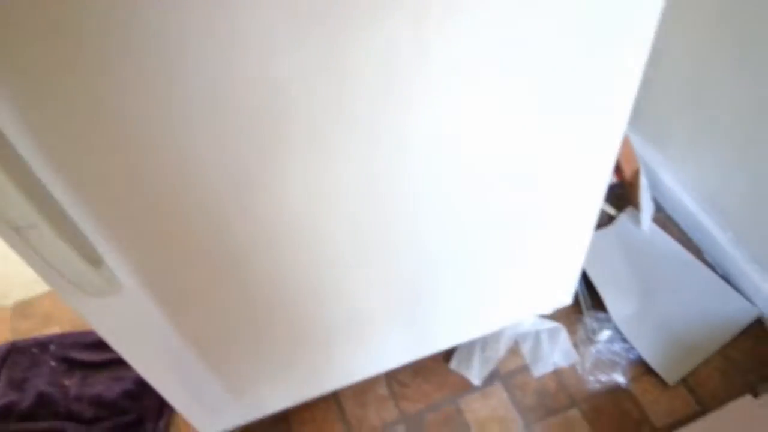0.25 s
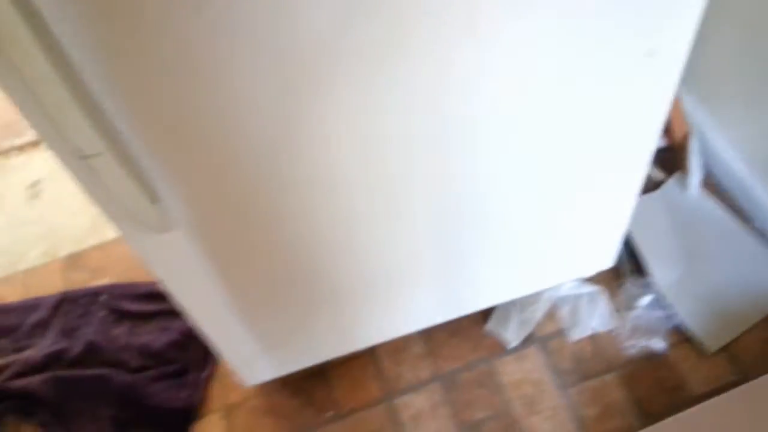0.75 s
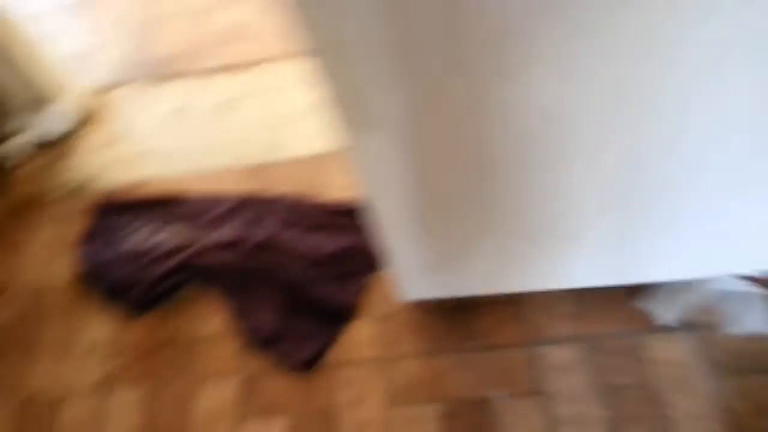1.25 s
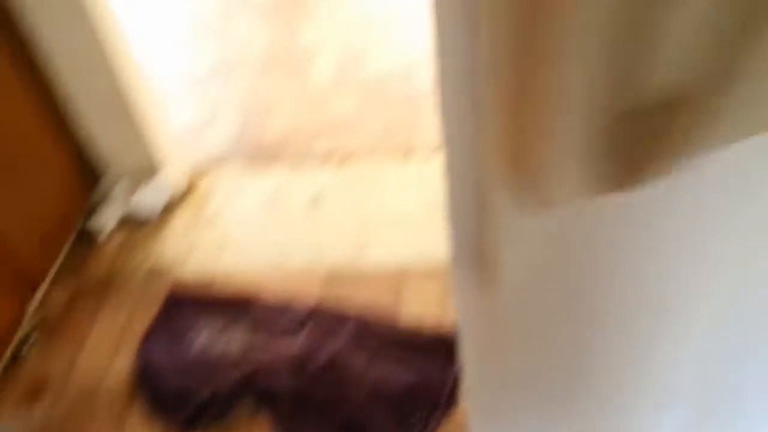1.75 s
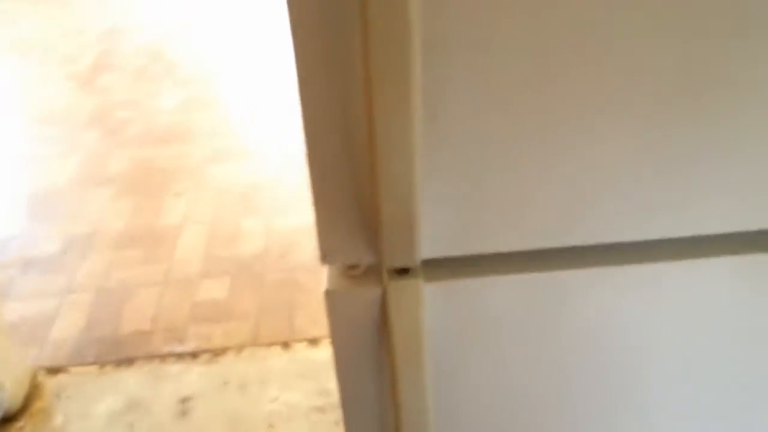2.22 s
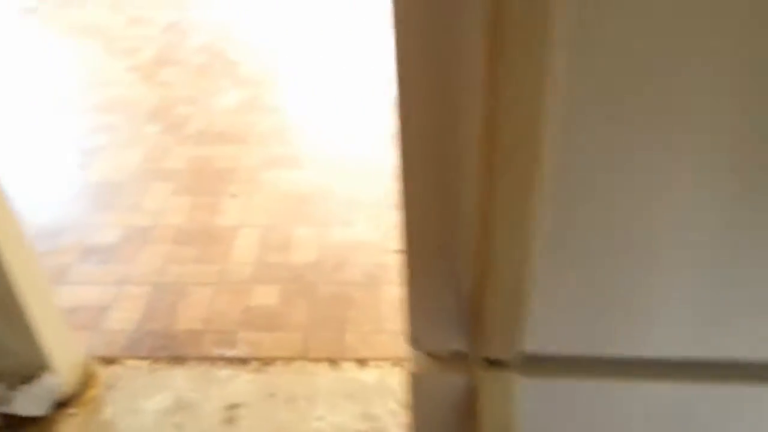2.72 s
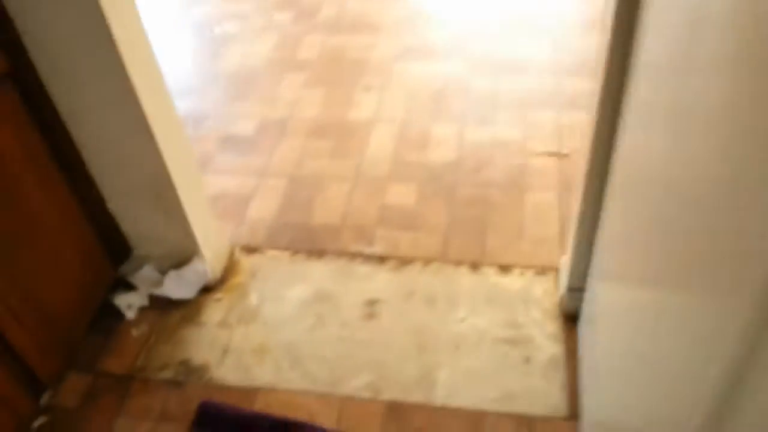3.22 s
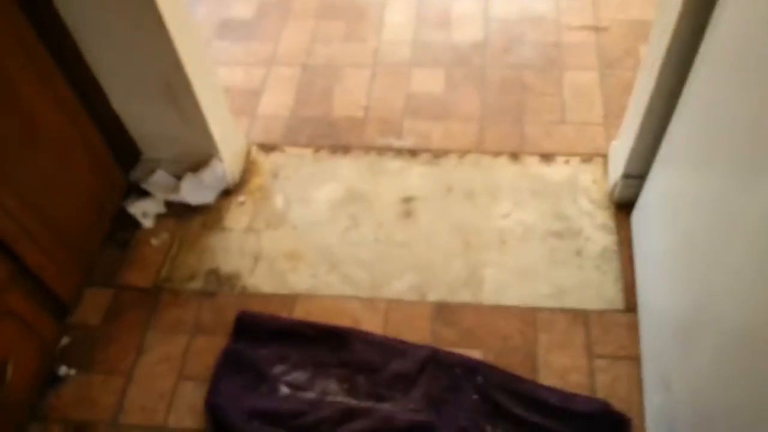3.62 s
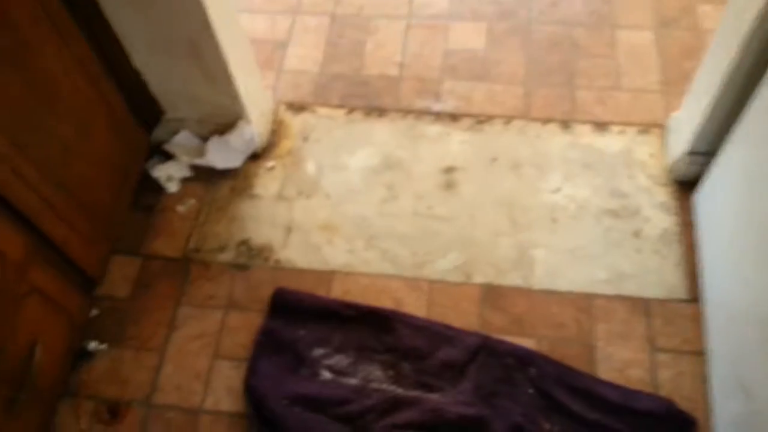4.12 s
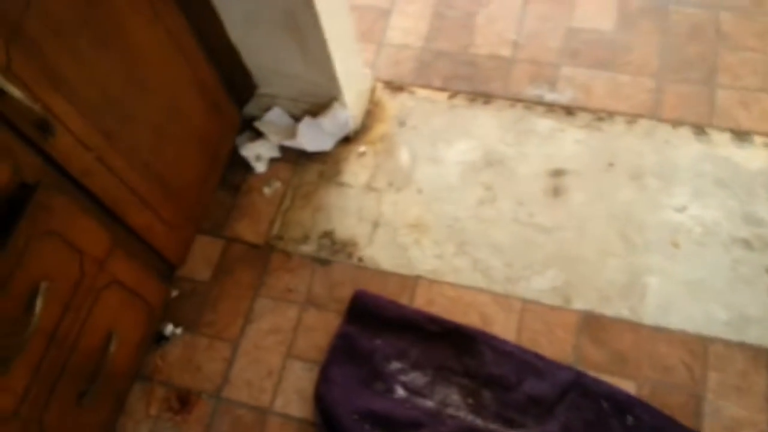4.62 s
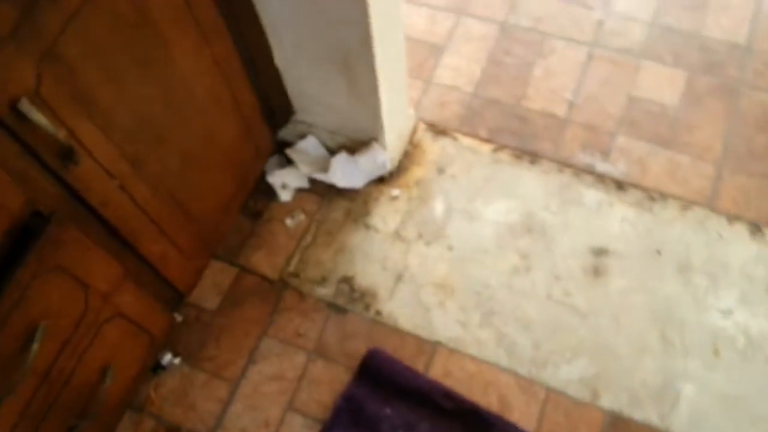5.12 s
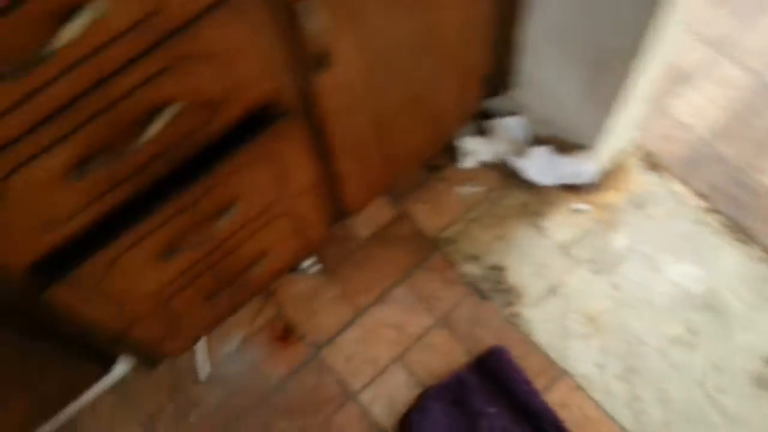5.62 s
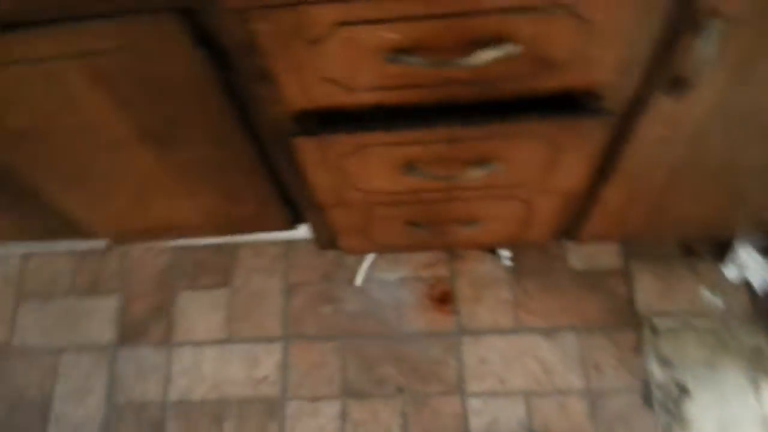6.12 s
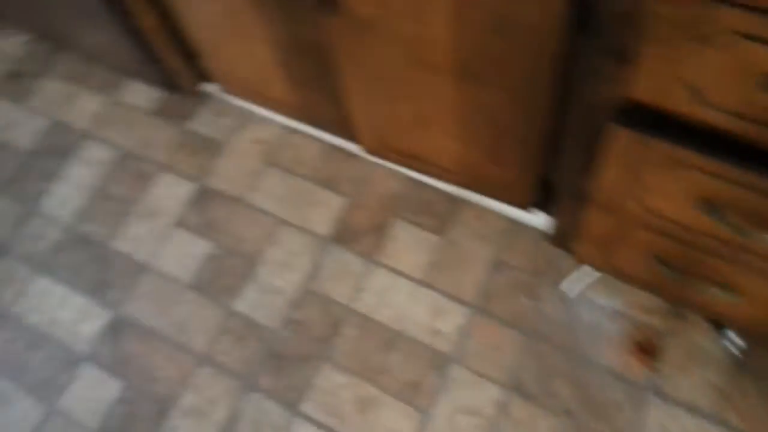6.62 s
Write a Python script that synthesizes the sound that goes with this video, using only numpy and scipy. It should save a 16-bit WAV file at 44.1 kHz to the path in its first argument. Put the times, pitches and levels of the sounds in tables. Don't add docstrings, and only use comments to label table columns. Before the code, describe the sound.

A refrigerator handle snaps and jars rattle, then the door slams hard, echoing through a tiled kitchen before shoes shuffle and tick on grit.

```python
import sys
import numpy as np
from scipy import signal
from scipy.fft import rfft, irfft
from scipy.io import wavfile
from scipy.ndimage import uniform_filter1d

SR = 44100
rng = np.random.default_rng(int(sys.argv[2]) if len(sys.argv) > 2 else 0)


def to_linear_factor(level_db):
    exponent = np.asarray(level_db, float) / 20
    return 10 ** exponent


def store_wav(level_fs):
    pcm = np.round(np.clip(np.atleast_2d(level_fs), -1, 1) * 32767)
    wavfile.write(sys.argv[1], SR, pcm.T.astype(np.int16))


N = 302159

# frequency in Hz, left-right likeness (-1 to 1).
LIKENESS = [(60, 0.29), (130, 0.99), (290, 0.95), (640, 0.58), (1400, -0.17), (15000, 0.056)]


def at_hz(points, hz):
    table_hz, values = np.array(points)[:, 0], np.array(points)[:, 1]
    return np.interp(np.log(hz), np.log(table_hz), values)


def in_time(rows, before=-120):
    s, *columns = np.transpose(rows)
    return np.array([np.interp(np.arange(N) / SR, s, c, before, before) for c in columns])


def rms_one(x):
    return x / np.sqrt(np.mean(x ** 2) + 1e-20)


def drift(rate, count):
    knots_per_s = 60
    knots = rng.standard_normal((count, int(N / SR * knots_per_s) + 2))
    r = np.exp(-2 * np.pi * rate / knots_per_s)
    slow = rms_one(signal.lfilter([1], [1, -r], knots))
    at = np.arange(N) / SR * knots_per_s
    return np.array([np.interp(at, np.arange(len(v)), v) for v in slow])


def bandpass(x, order, low_hz, high_hz):
    return signal.sosfilt(signal.butter(order, [low_hz, high_hz], "band", fs=SR, output="sos"), x)


def colour(x, spectrum, size=4096):
    cepstrum = irfft(np.log(to_linear_factor(at_hz(spectrum, np.linspace(1, SR / 2, size // 2 + 1)))))
    cepstrum[1:size // 2] *= 2
    cepstrum[size // 2 + 1:] = 0
    kernel = irfft(np.exp(rfft(cepstrum)))
    kernel = kernel / np.linalg.norm(kernel)
    return signal.fftconvolve(x, kernel[None], axes=1)[:, :x.shape[1]]


def ring(clicks, hz, t60):
    r, w = to_linear_factor(-60 / (t60 * SR)), 2 * np.pi * hz / SR
    return signal.lfilter([0, np.sin(w)], [1, -2 * r * np.cos(w), r * r], clicks + 1e-18)


def add(out, s, sound, pan_db):
    lag_s_per_db = 3e-5
    for k, side in enumerate((1, -1)):
        at = round((s - side * pan_db * lag_s_per_db) * SR)
        out[k, at:at + len(sound)] += to_linear_factor(side * pan_db / 4) * sound[:N - at]


def pair_noise(size, per_band):
    out, white = 0, rng.standard_normal((2, 2, size))
    edges = 25 * 2 ** np.arange(0, 9.6, .5)
    for k, (low, high) in enumerate(zip(edges, edges[1:])):
        centre = np.sqrt(low * high)
        mid, side = bandpass(white[k % 2], 2, low, high)
        alike = np.clip(at_hz(LIKENESS, centre), -1, 1)
        pair = np.sqrt(1 + alike) * mid + np.sqrt(1 - alike) * side * [[1], [-1]]
        out = out + per_band(k, centre) * pair
    return out


def grains(per_s, spread_db):
    sizes = to_linear_factor(spread_db * np.minimum(rng.exponential(1, (2, N)), 5)) * rng.choice([-1, 1], (2, N))
    return rms_one(sizes * (rng.random((2, N)) < per_s / SR))


def blow(hits, spectrum, modes, crack_db, modes_db, wet_db, edge_db, soft_hz):
    clicks, rung, crack = np.zeros((2, N)), np.zeros((2, N)), np.zeros((2, N))
    for s, db, pan_db in hits:
        add(clicks, s, to_linear_factor(np.array([db])), pan_db)
    first_s = hits[0][0]
    near = slice(round((first_s - .01) * SR), round((first_s + .5) * SR))
    pad = signal.butter(2, soft_hz, fs=SR, output="sos")
    padded = signal.sosfilt(pad, clicks[:, near])
    for k, (hz, level_db, t60) in enumerate(modes):
        rung[:, near] += (-1) ** k * to_linear_factor(level_db + modes_db) * ring(padded, hz, t60)
    crack[:, near] = colour(clicks[:, near], spectrum)
    rung[:, near] += to_linear_factor(crack_db) * signal.sosfilt(pad, crack[:, near])
    rung[:, near] += to_linear_factor(edge_db) * np.diff(crack[:, near], prepend=0)
    return rung, to_linear_factor(wet_db) * crack


def door_slam():
    # start in seconds, peak in dB, left-right in dB.
    slam_hits = [
        (2.3003, -23, 2.5),
        (2.3017, -0.5, 4),
        (2.3155, -21, -4),
        (2.3445, -14.5, 3.5),
    ]
    # frequency in Hz, density in dB per Hz.
    slam_spectrum = [(40, -36), (85, -17), (130, -5.5), (215, -2.5), (330, -4.5), (700, -1), (1200, 0),
                     (1600, -2.5), (2200, 5.5), (3200, -12), (5000, -26), (6500, -22.5), (8500, -34),
                     (11500, -32), (14000, -53)]
    # frequency in Hz, level in dB, t60 in seconds.
    door_modes = [(215, -10.5, 0.017), (685, 6.5, 0.0053), (2900, 2, 0.0045), (410, -29, 0.54),
                  (723, -28.5, 0.3), (955, -33, 0.22), (1243, -25.5, 0.69)]
    return blow(slam_hits, slam_spectrum, door_modes,
                crack_db=-16, modes_db=2, wet_db=23.0, edge_db=10, soft_hz=2550)


def handle_snap():
    # start in seconds, peak in dB, left-right in dB.
    snap_hits = [
        (.1665, -34, -5),
        (.1745, -10.5, 1.5),
    ]
    # frequency in Hz, density in dB per Hz.
    snap_spectrum = [(60, -20), (300, -19), (600, -11.5), (1100, -4), (1600, -8), (2300, -9), (2900, -15),
                     (3900, -23), (4700, -10), (5600, -5), (6100, -22), (14500, -38)]
    # frequency in Hz, level in dB, t60 in seconds.
    handle_modes = [(840, -7.5, 0.022), (1104, -2.5, 0.017), (2300, -20, 0.035), (2546, -15.5, 0.067),
                    (4700, -23, 0.08), (5010, -21, 0.14), (5450, -17, 0.11), (5750, -19, 0.08)]
    return blow(snap_hits, snap_spectrum, handle_modes,
                crack_db=9.5, modes_db=4, wet_db=21.5, edge_db=-5, soft_hz=12000)


def rattle():
    # time in seconds, level in dB.
    rattle_curve = [
        (.222, -54),
        (.226, -19.5),
        (.24, -21),
        (.255, -24.5),
        (.275, -29),
        (.287, -35.5),
        (.35, -38),
        (.38, -44),
        (.55, -66),
    ]
    # frequency in Hz, density in dB per Hz.
    rattle_spectrum = [(24, -41), (40, -25), (134, -4.5), (437, -7.5), (574, -4), (790, -12.5), (1500, -6),
                       (1830, -11), (2120, -6), (3220, -12.5), (4440, -18), (6000, -26.5), (7500, -21.5),
                       (11100, -29.5), (14500, -40)]
    hits = grains(per_s=4000, spread_db=2.5)
    return colour(to_linear_factor(in_time(rattle_curve)) * (hits + 0.7 * hits.mean(0)), rattle_spectrum)


def knocks():
    # start in seconds, peak in dB, pitch in Hz, left-right in dB.
    dull_knocks = [(0.057, -34.5, 324, -2), (0.089, -33.5, 320, 1), (0.171, -34, 194, 0.0),
                   (0.588, -47, 215, -3), (0.663, -33.5, 236, 3), (0.697, -39, 210, -11),
                   (0.971, -40, 720, 4), (0.983, -40.5, 313, 5), (0.999, -45.5, 518, 6),
                   (1.02, -56, 743, 4), (1.814, -46, 272, -1), (2.135, -50, 410, 2), (2.302, -21, 149, -2),
                   (2.159, -42.5, 406, 2), (2.189, -48, 835, -4.5), (3.276, -44, 940, -5),
                   (4.172, -46.5, 400, 4), (4.719, -50.5, 460, -5), (5.177, -42, 740, -1)]
    # start in seconds, peak in dB, pitch in Hz, left-right in dB.
    floor_thuds = [
        (0.421, -44, 104, -22),
        (0.679, -46.5, 120, 6),
        (0.757, -45, 108, 4),
        (0.82, -50, 65, 0),
        (1.001, -48, 83.4, 4),
        (1.949, -43, 86, 9),
        (1.989, -48, 103, 16.5),
        (2.04, -49.5, 61, -3),
    ]
    knock_t60_s, thud_t60_s = 0.096, 0.14
    out, t = np.zeros((2, N)), np.arange(round(.4 * SR)) / SR
    rows = [(*row, knock_t60_s) for row in dull_knocks] + [(*row, thud_t60_s) for row in floor_thuds]
    for (s, db, hz, pan_db, t60), white in zip(rows, rng.standard_normal((len(rows), len(t)))):
        puff = rms_one(bandpass(white, 2, 1.06 * hz, 1.85 * hz))
        body = np.sin(2 * np.pi * hz * t) + .5 * puff
        soft_start = 1 - np.exp(-t / .001)
        add(out, s, to_linear_factor(db - 60 * t / t60) * body * soft_start, pan_db)
    return out


def ticks():
    # start in seconds, peak in dB, pitch in Hz, left-right in dB.
    edge_ticks = [
        (0.056, -24.5, 1700, -5),
        (0.068, -24, 1690, 9.5),
        (.68, -36.5, 3180, -9),
        (1.889, -42, 1600, 3),
        (1.952, -42, 1730, 3.5),
        (2.772, -35, 2820, 5.5),
        (2.96, -41, 3100, 5),
    ]
    # start in seconds, peak in dB, pitch in Hz, left-right in dB.
    grit_cracks = [(3.278, -26.5, 3520, 1.5), (3.38, -36, 2900, 4.5), (4.172, -47, 1500, 3),
                   (4.22, -44, 2400, 7.5), (5.178, -49, 1500, 5), (4.2515, -37, 3300, 7),
                   (4.2721, -30.5, 2070, 6.5), (4.308, -31.5, 2300, 4.5), (4.604, -43, 2900, 1),
                   (5.184, -32.5, 2600, -0.5), (5.213, -29, 2400, 5), (5.2192, -22.5, 1530, 4),
                   (5.222, -22, 2820, 6), (5.245, -39, 1930, -2.5), (6.107, -42, 1800, -2),
                   (6.19, -36, 3900, 6.5), (6.2845, -25.5, 3600, 7.5), (6.295, -23, 3300, 6.5),
                   (6.3, -30, 3000, 6), (6.311, -26, 4280, 0.5), (6.321, -30, 2220, 0.5),
                   (6.326, -35, 3780, 4.5), (6.34, -44, 1620, 2), (6.401, -41, 2440, -1)]
    rows = edge_ticks + grit_cracks
    out, t = np.zeros((2, N)), np.arange(round(.03 * SR)) / SR
    for (s, db, hz, pan_db), puff in zip(rows, rng.standard_normal((len(rows), len(t)))):
        snap = 1.5 * np.sin(2 * np.pi * hz * t) * np.exp(-t * hz / 1.1)
        add(out, s, to_linear_factor(db) * (snap + 0.32 * puff * np.exp(-t / 0.0055)), pan_db)
    return bandpass(out + 1e-18, 6, 700, 5300)


def pressure():
    # time in seconds, level in dB.
    moving = [(0, -68), (.5, -52), (.8, -59.5), (1, -59.5), (1.15, -66), (1.7, -66), (1.85, -61),
              (2.25, -59), (2.8, -54), (3.1, -60), (3.5, -60.5), (4, -64), (4.1, -67.5), (4.4, -62),
              (5.15, -60.5), (5.7, -65.5), (6.5, -59.5), (6.85, -51)]
    # start in seconds, held in seconds, level in dB,
    # brightness in dB per range.
    drags = [(0.057, 0.014, -50.5, -12.5), (.16, 0.011, -52, 3), (.44, 0.016, -55.5, 6),
             (.655, 0.024, -63, -9.5), (1.355, 0.018, -63.5, 4), (1.61, .02, -72, 3),
             (1.78, 0.028, -64.5, -2.5), (1.93, 0.031, -60, -2), (2.609, 0.035, -45.5, 1.5),
             (2.96, 0.011, -78.5, -9), (3.281, 0.033, -50, 0), (3.37, 0.025, -60.5, -1),
             (4.17, 0.03, -66.5, -5), (4.25, 0.051, -58.5, -1.5), (4.59, 0.047, -58.5, 2.2),
             (4.71, 0.018, -59, -1.5), (5.03, 0.066, -61.5, 3.5), (5.181, 0.052, -44.5, -0.5),
             (5.28, 0.17, -51.5, -1), (5.37, 0.042, -52.5, 0), (5.45, 0.081, -58.5, 6),
             (5.98, 0.013, -79.5, -9), (6.1, 0.012, -67, 2), (6.276, 0.037, -48, 0.5),
             (6.37, 0.022, -57, -3)]
    range_db = [-2, -3, -8]
    moving_flicker_db, thrum_db, thrum_flicker_db = 3, -63, 2
    seal_s, seal_db, seal_swell_db_per_s = 2.299, -40.5, 712
    attack_db_per_s, release_db_per_s = 913, 241
    t, step = np.arange(N) / SR, np.array([[-1], [0], [1]])
    flicker = drift(8.2, count=2)
    cloth = to_linear_factor(in_time(moving)[0] + moving_flicker_db * flicker[0])
    seal = (t < seal_s) * to_linear_factor(seal_db - seal_swell_db_per_s * np.abs(seal_s - t))
    rub = (cloth + seal) * np.ones_like(step)
    for s, held, db, bright_db in drags:
        near = slice(max(round((s - .06) * SR), 0), round((s + held + .25) * SR))
        attack = attack_db_per_s * np.minimum(t[near] - s, 0)
        release = release_db_per_s * np.maximum(t[near] - s - held, 0)
        rub[:, near] += to_linear_factor(db + bright_db * step + attack - release)
    thrum = to_linear_factor(thrum_db + thrum_flicker_db * flicker[1])
    return [thrum, *(rub * to_linear_factor(np.array(range_db))[:, None])]


def shuffle():
    # low edge in Hz, high edge in Hz.
    ranges_hz = [
        (70, 260),
        (450, 2080),
        (2100, 4350),
        (5800, 18400),
    ]
    gains, rub, out = pressure(), grains(per_s=6000, spread_db=2.5), 0
    for gain, (low_hz, high_hz) in zip(gains, ranges_hz):
        band = rms_one(bandpass(rub, 3, low_hz, high_hz))
        alike = np.clip(at_hz(LIKENESS, np.sqrt(low_hz * high_hz)), 0, 1)
        out = out + gain * rms_one((1 - alike) * band + alike * band[0])
    return out


def kitchen(x, first_s=0.001, lumpy_db=4.0):
    # frequency in Hz, t60 in seconds.
    wall_t60 = [(60, 0.62), (250, 0.68), (1000, 0.83), (3000, 0.7), (6000, 0.66), (9000, 0.46),
                (14000, 0.22)]
    t = np.arange(round(1.4 * SR)) / SR
    tail = pair_noise(len(t), lambda k, hz: to_linear_factor(-60 * t / at_hz(wall_t60, hz)))
    lumps = np.repeat(rng.standard_normal(len(t) // 64 + 1), 64)[:len(t)]
    tail = tail * to_linear_factor(lumpy_db * lumps * np.exp(-t / 0.045)) * np.clip(t / first_s - .5, 0, 1)
    tail = tail / np.sqrt(np.sum(tail ** 2) / 2)
    return signal.fftconvolve(x.mean(0)[None], tail, axes=1)[:, :N]


def hush(level_db=-57.5, patchy_db=-1.1):
    # frequency in Hz, density in dB per Hz.
    hush_spectrum = [(25, -7), (50, 1.5), (120, -10), (220, 3.5), (300, -7.5), (420, -2), (800, -4.5),
                     (1300, -17), (2500, -12.5), (4500, -20), (6300, -35.5), (8500, -15), (12000, -23.5),
                     (14800, -22.5)]
    together, own = drift(7.2, count=1)[0], drift(4.9, count=19)

    def band_gain(k, hz):
        return to_linear_factor(at_hz(hush_spectrum, hz) + patchy_db * (0.54 * together + 0.37 * own[k]))

    return to_linear_factor(level_db) * rms_one(pair_noise(N, band_gain))


def hum():
    # frequency in Hz, width in Hz, level in dB.
    room_modes = [(153.2, 11.4, -68), (232, 19.4, -62), (309.2, 25, -62.5), (347, 20, -70)]
    out, white = 0, rng.standard_normal((2, N))
    pair = white[0] + 0.74 * white[1] * [[1], [-1]]
    for hz, width_hz, db in room_modes:
        out = out + to_linear_factor(db) * rms_one(ring(pair, hz, 2.8 / width_hz))
    return out


def scene():
    slam, slam_out = door_slam()
    snap, snap_out = handle_snap()
    shaken, dull, sharp, feet = rattle(), knocks(), ticks(), shuffle()
    wet = slam_out + snap_out + to_linear_factor(-9.5) * shaken + to_linear_factor(-4.5) * dull + to_linear_factor(-4.5) * sharp + to_linear_factor(-9.5) * feet
    return slam + snap + shaken + dull + sharp + feet + kitchen(wet) + hush() + hum()


def masking(x, size=1024):
    above_hz, under_db, ragged_db = 9500, -57.5, 2.2
    hz, _, frames = signal.stft(x, SR, nperseg=size)
    power = np.mean(np.abs(frames) ** 2, axis=0)
    whole = uniform_filter1d(power.sum(0) + 1e-12, size=3)
    quieter = np.minimum(whole, np.roll(whole, 2))
    patches = rng.standard_normal((len(hz) // 12 + 1, power.shape[1]))
    chance = np.repeat(uniform_filter1d(patches, size=3), 12, axis=0)[:len(hz)]
    share = uniform_filter1d(uniform_filter1d(power, size=16, axis=0), size=3) / quieter
    kept = (hz[:, None] < above_hz) | (share > to_linear_factor(2 * (under_db + ragged_db * chance)))
    return signal.istft(frames * kept, SR, nperseg=size)[1][:, :N]


def low_pass(x):
    return signal.sosfilt(signal.butter(12, 15630, fs=SR, output="sos"), x)


def record(dry):
    heard = signal.sosfilt(signal.butter(3, 59, "high", fs=SR, output="sos"), dry)
    rounded = 1.04 * np.tanh(heard / 1.04)
    cut = signal.sosfilt(signal.cheby2(16, 70, 15300, fs=SR, output="sos"), rounded)
    return low_pass(masking(cut))


dry = scene()
out = record(dry)
store_wav(out)
```